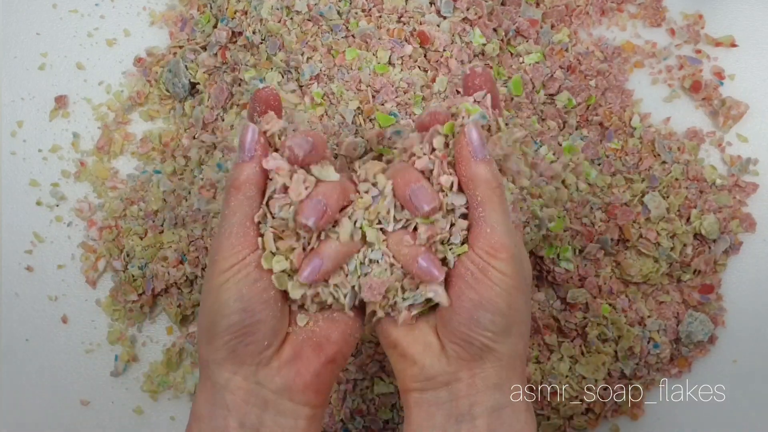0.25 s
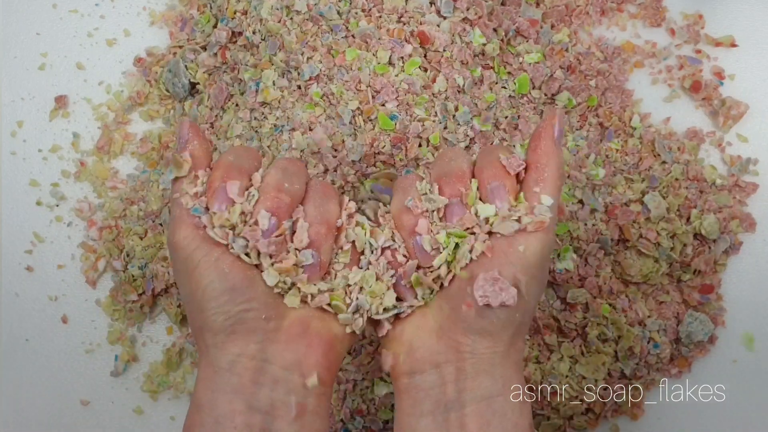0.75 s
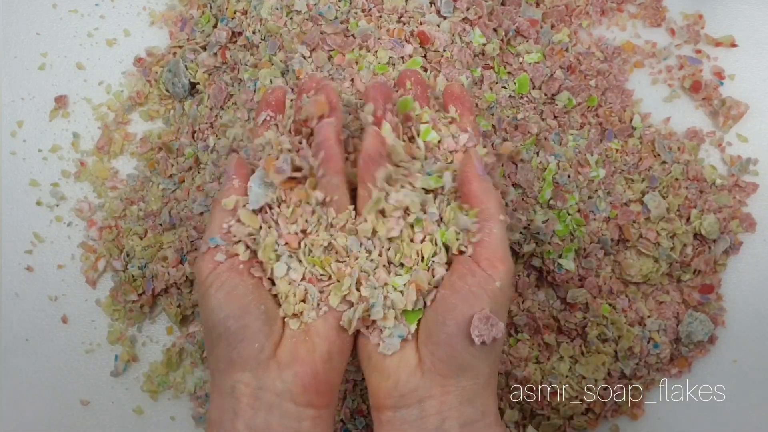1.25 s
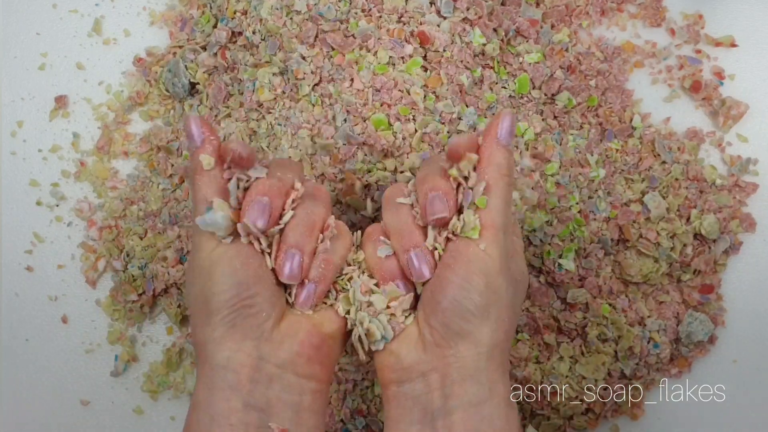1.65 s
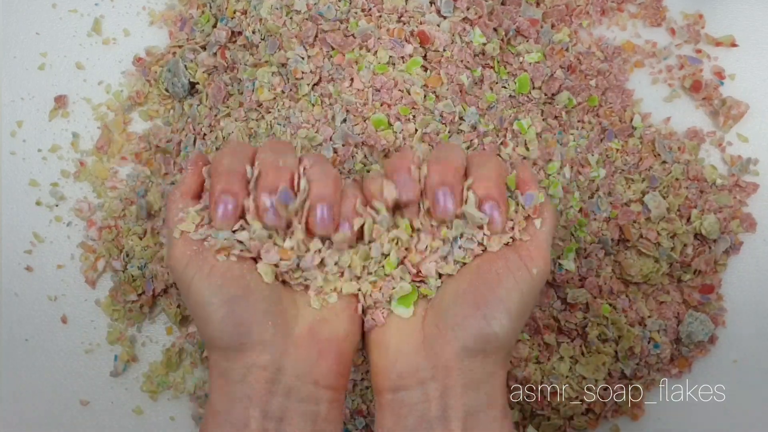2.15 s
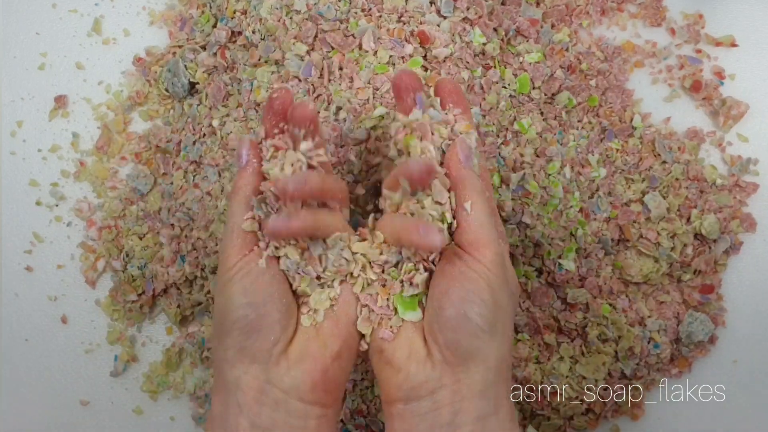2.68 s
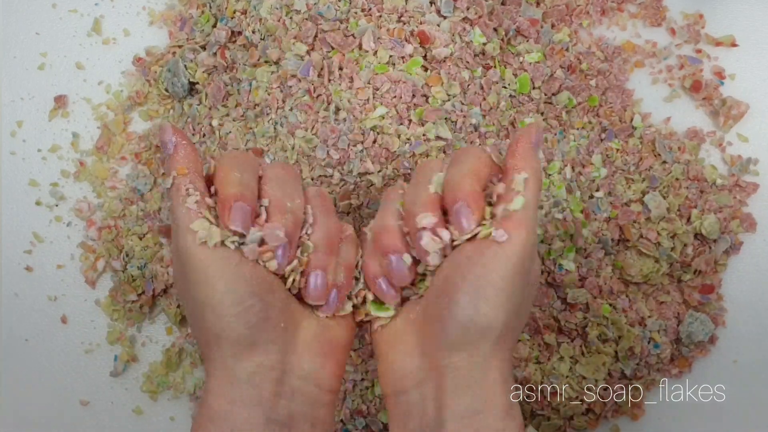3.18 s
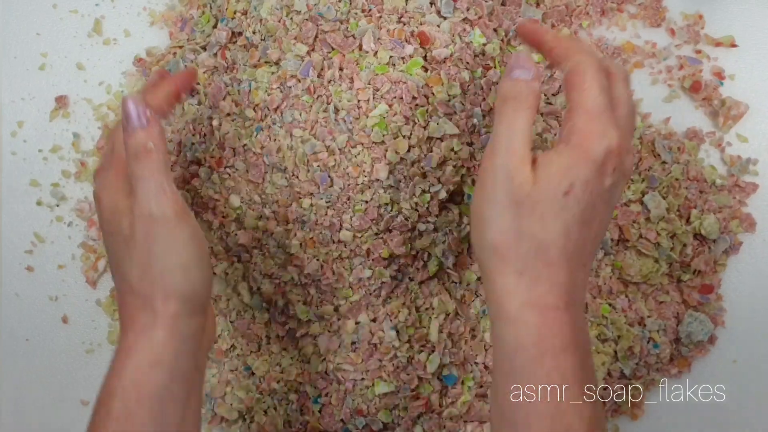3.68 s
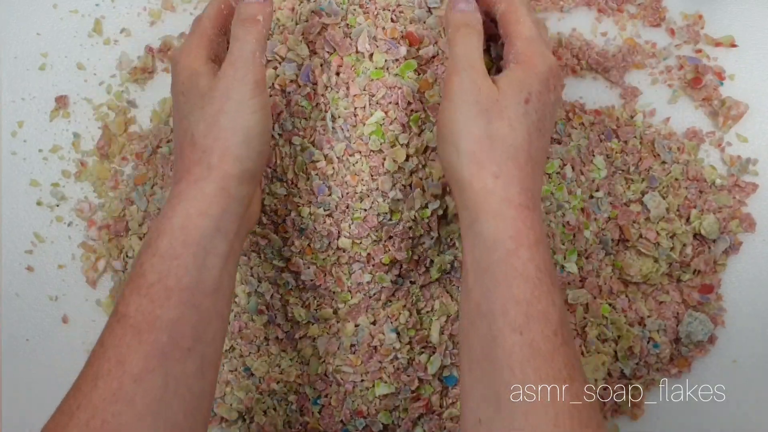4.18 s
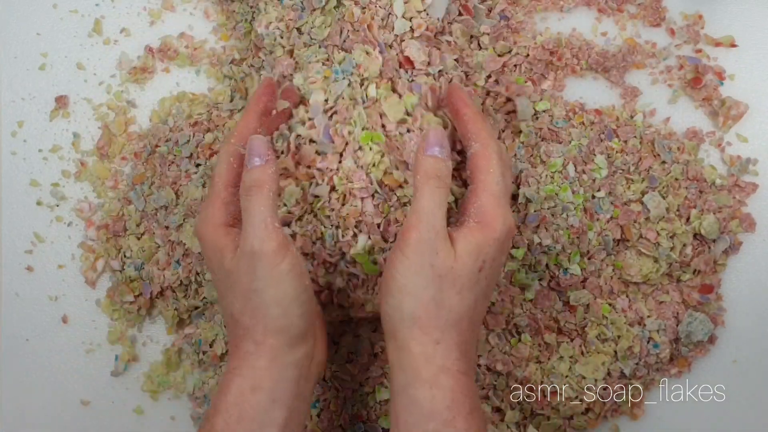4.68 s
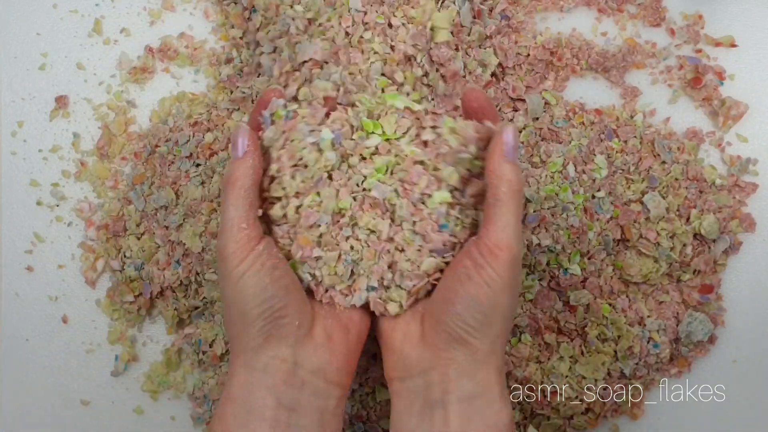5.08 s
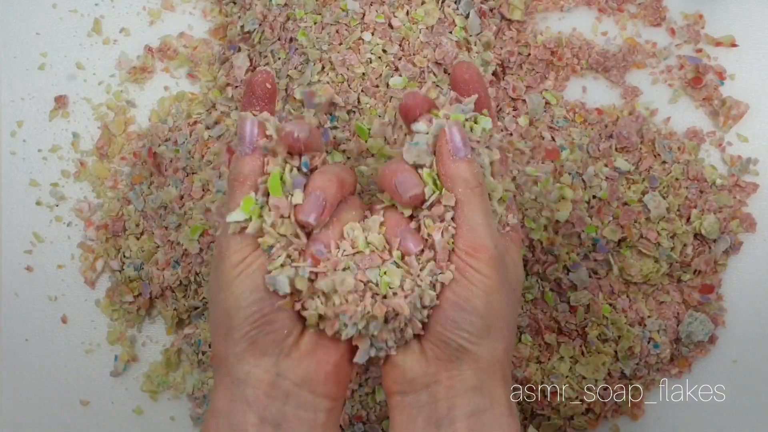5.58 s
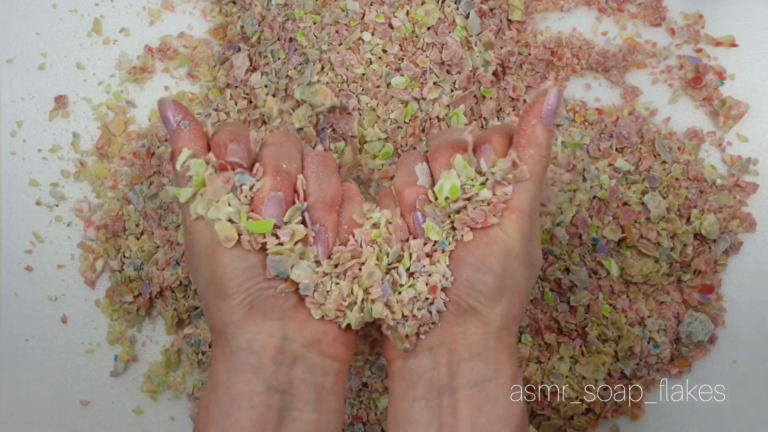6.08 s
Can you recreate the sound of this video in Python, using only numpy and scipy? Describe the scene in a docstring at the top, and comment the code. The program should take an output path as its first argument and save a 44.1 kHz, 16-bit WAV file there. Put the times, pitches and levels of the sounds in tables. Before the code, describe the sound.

Crackly trickling of dry soap flakes kneaded by two hands, nearly pausing, then a low scraping push and a renewed dense, crisp rustle.

```python
"""Hands in a pile of dry soap flakes

Two hands knead, sift and scoop the flakes on a table, close to a pair of microphones, over a hum in a quiet room.
Random tiny contacts make the rustle; filtered noise bursts make single flakes snap as they break.
Duller contacts rub, crunch and rasp in the heap, damped tones thud, and resonances make the table rumble."""
import sys
import numpy as np
from scipy import signal
from scipy.fft import rfft, irfft, next_fast_len
from scipy.io import wavfile

SR = 44100
rng = np.random.default_rng(int(sys.argv[2]) if len(sys.argv) > 2 else 0)


def dump_mix(stems):
    """Bounce the given channels to the path in sys.argv[1] as a 16-bit WAV at rate SR."""
    frames = np.atleast_2d(stems).T  # one column per channel
    limited = np.clip(frames, -1, 1)  # hard clip at full scale
    pcm = np.round(limited * 32767).astype(np.int16)
    wavfile.write(sys.argv[1], SR, pcm)


N = 279153
TIME = np.arange(N) / SR  # seconds

# extra brightness of a breaking edge: pitch_hz, gain_db
EDGE_BRIGHTNESS = [(3500, -6), (5200, -2.5), (7000, -1.5), (10000, -6), (12500, 1), (15500, -4)]
CRUNCH_PAN_DB = 0.5  # left minus right, for crunching, rasping and cracking


def undb(db):
    """Turn decibels into gain."""
    return 10 ** (np.asarray(db) / 20)


def curves(points):
    """Join each column of a table by straight lines in time."""
    s, *columns = np.transpose(points)
    return [np.interp(TIME, s, column) for column in columns]


def unit(x):
    """Scale a stereo sound so that the average of its two sides has rms 1."""
    middle = x.mean(axis=0)
    return x / np.sqrt(np.mean(middle ** 2))


def pan(db):
    """Left and right gains for a level difference, left minus right, with an average power of 1."""
    gains = undb(np.array([db, -db]).reshape(2, -1) / 2)
    return gains / np.sqrt(np.mean(gains ** 2, axis=0))


def colour(x, points):
    """Filter a sound through (pitch_hz, gain_db) points, without any sound before its cause."""
    size = next_fast_len(N + SR // 10, real=True)
    hz, db = np.transpose(points)
    bin_hz = np.arange(size // 2 + 1) * SR / size
    # the 1 Hz offset avoids the logarithm of zero
    log_gain = np.log(undb(np.interp(np.log(bin_hz + 1), np.log(hz), db)))
    # folding the cepstrum forward gives the filter its minimum phase
    cepstrum = irfft(log_gain, size)
    cepstrum[1:size // 2] *= 2
    cepstrum[size // 2 + 1:] = 0
    response = np.exp(rfft(cepstrum))
    return irfft(rfft(x, size) * response, size)[..., :N]


def resonate(x, hz, width_hz):
    """Let one resonance ring, with gain 1 at its centre."""
    b, a = signal.iirpeak(hz, hz / width_hz, fs=SR)
    return signal.lfilter(b, a, x)


def walk(rate):
    """A wandering random value that gets a new target rate times a second; spread near 1."""
    knots = rng.standard_normal(N // 10)
    # straight lines between the knots shrink the spread; the factor restores it
    return np.sqrt(3 / 2) * np.interp(TIME * rate, np.arange(len(knots)), knots)


def add(track, s, sound):
    """Mix a short stereo sound into a track at time s."""
    start = max(int(s * SR), 0)
    track[:, start:start + sound.shape[1]] += sound[:, :N - start]


def swell(peak_s, rise_s, fall_s, db):
    """Gain of one hand movement: it grows to a rounded peak and dies away."""
    span_db, roundness = 20, 1.413  # drop over one rise or fall time; above 1 the top is rounder, the ends steeper
    before = (peak_s - TIME) / max(rise_s, .01)
    after = (TIME - peak_s) / max(fall_s, .01)
    away = np.maximum(before, after)
    return undb(db - span_db * np.minimum(away, 10) ** roundness)


def together(gains):
    """Overlapping movements add in power."""
    return np.sqrt(sum(gain ** 2 for gain in gains))


def contacts(rate, scatter_db, spread_db, likeness):
    """Random tiny impacts of uneven size, each from its own place between the microphones."""
    happens = rng.random(N) < rate / SR
    # a faster flow has smaller impacts, so the average power stays alike
    size = happens * undb(scatter_db * np.minimum(rng.exponential(size=N), 5)) / np.sqrt(rate)
    energy = (size * pan(spread_db * rng.standard_normal(N))) ** 2
    # each contact scrapes for a fraction of a millisecond
    decay = np.exp(-1 / (0.00022 * SR))
    scrape = np.sqrt(signal.lfilter([1], [1, -decay], energy + 1e-18))
    # likeness is the share of noise power that both sides have in common
    likeness = np.clip(likeness, 0, 1)
    shared = np.sqrt(likeness) * rng.standard_normal(N)
    separate = np.sqrt(1 - likeness) * rng.standard_normal((2, N))
    return scrape * (shared + separate)


def background():
    """A distant motor beats slowly against the mains hum, over still room air made of filtered noise."""
    # steady tones of the hum: pitch_hz, level_db (rms, before it wanders)
    hum_tones = [(49.21, -69), (98.46, -75), (100.05, -71)]
    # colour of the room air: pitch_hz, relative_level_db (per Hz)
    air_colour = [(20, -4), (60, -3), (150, -16.5), (400, -13), (1000, -26.5), (3000, -35), (16000, -24.5)]
    hum = np.zeros(N)
    for k, (hz, db) in enumerate(hum_tones):
        gain = np.sqrt(2) * undb(db + 0.77 * walk(3.3))
        tone = np.sin(2 * np.pi * hz * TIME + 0.4 * walk(4.0))
        hum += (-1) ** k * gain * tone  # every other tone is turned upside down
    air = colour(rng.standard_normal(N) + .5 * rng.standard_normal((2, N)), air_colour)
    return hum + unit(air) * undb(-68.5)


def room(x):
    """A small room answers softly from all sides: a noise tail that falls 60 dB in 0.2 s."""
    # colour of the answer: pitch_hz, gain_db (against the direct sound)
    echo_colour = [(150, -17), (300, -15), (600, -9), (1500, -8), (6000, -7), (13000, -9)]
    t = TIME[:SR // 3]
    tail = rng.standard_normal((2, len(t))) * undb(-60 * t / 0.2) * (1 - np.exp(-t / 0.00052))
    tail /= np.sqrt(np.sum(tail ** 2, axis=1, keepdims=True))
    echo = signal.fftconvolve(x, tail, axes=1)[:, :N]
    return x + colour(echo, echo_colour)


def table():
    """Flakes ground under the dragging hands set the resonances of the table top rumbling."""
    # the edges of the hands dragging along the table: peak_s, rise_s, fall_s, level_db
    hand_drag = (3.985, 0.1258, 0.4673, -47)
    # resonances of the table top: pitch_hz, width_hz, relative_level_db
    table_modes = [(225, 10, 13), (292, 40, 15), (325, 14, 11), (404, 27, 15.5), (496, 23, 17.5),
                   (600, 61, 15.5), (735, 37, 17), (960, 50, 17)]
    push = contacts(3500, scatter_db=2, spread_db=2, likeness=.95)
    rumble = sum(undb(db) * resonate(push, hz, width_hz) for hz, width_hz, db in table_modes)
    return unit(rumble) * swell(*hand_drag)


def knocks():
    """A blunt contact gives a short damped thud and a shiver of loose flakes."""
    # fingers and lumps that knock on the heap and table:
    # start_s, level_db (for thud and shiver alike), pitch_hz, ring_ms (time for the thud to fall to 37 %)
    knock_list = [(.086, -38, 755, 3.3), (.667, -37.5, 1755, 5.5), (0.931, -44, 518, 3.7),
                  (.998, -45, 1720, 2.1), (1.534, -47, 810, 11), (1.583, -36.5, 535, 3.2),
                  (1.597, -37, 820, 1.6), (1.721, -44.5, 1700, 12.6), (3.859, -26.5, 825, 2.3),
                  (3.893, -28.5, 760, 2.4), (4.008, -38, 500, 2.2), (4.219, -37, 1080, 2.5),
                  (5.328, -48, 468, 3.8), (5.551, -40.5, 810, 0.63), (6.222, -40, 730, 6.8)]
    t = TIME[:SR // 10]
    out = np.zeros((2, N))
    for s, db, hz, ring_ms in knock_list:
        thud = np.sin(2 * np.pi * hz * t) * np.exp(-1000 * t / max(ring_ms, .3))
        noise = rng.standard_normal((2, len(t))) + rng.standard_normal(len(t))
        shiver = unit(resonate(noise, hz, 0.67 * hz)) * np.exp(-t / 0.015)
        add(out, s, undb(db) * (undb(-5.5) * thud + undb(-13.0) * shiver))
    return out


def heap(flow):
    """Buried flakes rub dully, crunch against each other and rasp along the skin."""
    # the fingers push into the heap:
    # peak_s, rise_s, fall_s, rub_db (dull rubbing), crunch_db (relative to the rubbing)
    presses = [(.07, 0.38, 0.27, -58, -4), (.3, 0.48, 0.61, -62.5, -1.5), (.68, 0.28, 0.32, -65.5, -2.5),
               (.88, 0.13, 0.27, -63, -11.5), (1.02, 0.065, 0.31, -67.5, 3), (1.6, 0.22, .24, -57, -13),
               (2.031, 0.094, 0.28, -60.5, -16), (2.66, 0.16, 0.61, -80, -6), (2.98, 0.17, 0.48, -75.5, -7),
               (3.36, 0.3, 0.45, -65.5, -7), (3.64, 0.31, 0.69, -68.5, -10), (4.042, 0.16, 0.2, -44, -9.5),
               (4.68, 0.22, 0.24, -59, -11), (4.88, 0.2, 0.085, -65, -4.5), (5.22, 0.051, 0.39, -66, -4),
               (5.39, 0.3, 0.28, -57.5, -5.5), (5.87, 0.6, 0.33, -64, -6.5), (6.25, 0.35, 0.21, -58, -8)]
    # a closing hand squeezes flakes along the skin: peak_s, rise_s, fall_s, rasp_db
    squeezes = [(.67, .18, 0.11, -64.5), (1.01, 0.062, 0.11, -65), (1.72, 0.16, 0.14, -64.5),
                (2.0, 0.29, 0.42, -74), (3.27, 0.49, .15, -76.5), (4.06, 0.15, 0.28, -55),
                (5.95, 0.3, 0.15, -65.5), (6.23, 0.36, 0.16, -70.5)]
    # colours of the three sounds: pitch_hz, relative_level_db
    rub_colour = [(100, -20.5), (200, -14), (290, -11), (420, 5.5), (600, -3.5), (780, -1), (1020, -4.5),
                  (1350, -16), (2200, -52), (5000, -46)]
    crunch_colour = [(600, -33), (1300, -10), (1800, -6.5), (2300, -2), (2800, 1.5), (3400, -8.5),
                     (4500, -2), (8000, -18.5)]
    rasp_colour = [(700, -43), (1250, -1), (1550, 5), (1780, 6.5), (2050, 2), (2600, -5), (5000, -52)]
    rubbing = together(swell(s, rise, fall, db) for s, rise, fall, db, _ in presses)
    crunching = together(swell(s, rise, fall, db + crunch_db) for s, rise, fall, db, crunch_db in presses)
    # every push rasps a little too
    rasping = together([rubbing * undb(-20.5)] + [swell(*squeeze) for squeeze in squeezes])
    rub = colour(contacts(.25 * flow, scatter_db=2.8, spread_db=3, likeness=.85), rub_colour)
    crunch = colour(contacts(.4 * flow, scatter_db=3.2, spread_db=7, likeness=.08), crunch_colour)
    rasp = colour(contacts(.3 * flow, scatter_db=2.9, spread_db=5, likeness=.15), rasp_colour)
    crisp_part = unit(crunch) * crunching + unit(rasp) * rasping
    return unit(rub) * rubbing + crisp_part * pan(CRUNCH_PAN_DB)


def flake_ring(x):
    """Thin flakes ring in the top treble, with a different left-right balance at each pitch."""
    # ring of the flakes: pitch_hz, gain_db
    ring_colour = [(1500, -28.5), (3300, -27.5), (4100, -17), (5600, -15), (7300, -5.5), (8600, -13.5),
                   (10200, -7.5), (12000, -5), (13400, -1.5), (15800, -6)]
    # balance between the sides: pitch_hz, left_minus_right_db
    ring_balance = [(4000, -2), (7500, -4.5), (9500, -3), (12800, 6), (15500, -1)]
    left, right = colour(x, ring_colour)
    to_left = [(hz, db / 2) for hz, db in ring_balance]
    to_right = [(hz, -db / 2) for hz, db in ring_balance]
    return np.array([colour(left, to_left), colour(right, to_right)])


def fractures(t, count):
    """Envelope of one break: a first fracture, a few smaller ones soon after, and settling crumbs."""
    height_s = 0.00044  # time from the start of a fracture to its height
    run_s, run_db = 0.0079, -8  # latest start and greatest level of the smaller fractures
    crumbs_db, crumbs_s = -15, .006  # level and decay time of the crumbs
    delays = np.append(0, run_s * rng.random(count))
    sizes = np.append(1, undb(run_db) * rng.random(count))
    ages = np.maximum(t - delays[:, None], 0) / height_s
    crumbs = undb(crumbs_db) * np.exp(-t / crumbs_s) * (1 - np.exp(-ages[0]))
    return sizes @ (ages * np.exp(1 - ages)) ** 2 + crumbs


def snaps():
    """A flake breaks in a quick run of fractures, then its crumbs settle."""
    # the loudest flakes that snap or land: start_s, level_db (before the filters),
    # left_minus_right_db (of the bright part), crack_db (low crack, relative to level_db)
    snap_list = [(.063, -22, -12, -30), (.334, -29, 1, -40), (0.4963, -20.5, 37, -30),
                 (0.6672, -17.5, -13, -36), (0.7756, -17.5, 5.5, -27), (.7905, -18, 18, -45),
                 (0.8284, -20, 31, -32), (0.8779, -20, 26, -28), (0.93, -20.5, 9, -34),
                 (.9818, -16, 2, -24), (0.9973, -10, -20, -9.5), (1.0909, -18.5, -35, -16.5),
                 (1.1458, -24, -4, -29), (1.3076, -38, 5, -32), (1.5843, -18, -3, -26),
                 (1.8945, -30, 13, -30), (1.9201, -23, 5, -20.5), (2.0084, -27, 7, -37),
                 (2.4322, -26, 6, -39), (2.5856, -24.5, 7, -45), (2.688, -35, 8, -40),
                 (2.6966, -28, 1, -46), (3.0645, -26.5, 12, -27), (3.107, -24, 9, -53),
                 (3.2529, -27.5, 8, -28), (3.3148, -25.5, 1, -37), (3.6689, -22.5, 7, -41),
                 (3.7649, -25, 1, -42), (3.8577, -20, 2, -44), (3.887, -17.5, -11, -31),
                 (5.7612, -23.5, 18, -39), (5.8148, -27, 11, -32), (6.285, -18, 3, -24)]
    # body of a thick flake: pitch_hz, gain_db
    crack_colour = [(400, -20), (1000, -12), (1500, -1), (2200, 1), (3000, -12), (4000, 0), (5500, -4),
                    (7300, -7), (10000, -20)]
    t = TIME[:SR // 12]
    bright, low = np.zeros((2, N)), np.zeros((2, N))
    for s, db, pan_db, crack_db in snap_list:
        noise = rng.choice([-1, 1], (2, len(t)))
        burst = noise * fractures(t, count=3) * undb(db)
        add(bright, s, burst * pan(pan_db))
        # a thick flake also cracks lower down
        add(low, s, burst * undb(crack_db))
    ring = flake_ring(colour(bright, EDGE_BRIGHTNESS))
    return ring + colour(low, crack_colour) * pan(CRUNCH_PAN_DB)


def slips(rate, settle_s):
    """Power of little avalanches: each starts at once and dies away; its average is near 1."""
    power = (rng.random(N) < rate / SR) * rng.exponential(size=N) / (rate * settle_s)
    return signal.lfilter([1], [1, -np.exp(-1 / (settle_s * SR))], power)


def rustle(flow):
    """Fine crumbs trickle more smoothly; larger flakes slip in crisp avalanches, rougher in a slow flow."""
    # flakes trickling through the moving hands: time_s, level_db
    sift_levels = [(0, -42), (.5, -45.5), (.63, -47.5), (.93, -53.5), (1.2, -51), (1.6, -48.5),
                   (1.85, -53.5), (2.4, -56.5), (2.8, -54), (3.03, -51), (3.28, -61), (3.82, -69),
                   (3.9, -54), (4.47, -54.5), (4.58, -52), (5.08, -52), (5.4, -41), (5.75, -48.5),
                   (6.33, -50)]
    # a batch of flakes gives way and slides: peak_s, rise_s, fall_s, level_db, left_minus_right_db
    spill_list = [(.53, 0.064, 0.035, -42.5, 0), (.675, 0.035, 0.07, -43, 3), (.83, 0.065, 0.13, -48, 0),
                  (1.0, 0.023, 0.18, -49.5, 6), (1.659, 0.12, 0.068, -43.5, 1.5),
                  (2.19, 0.026, 0.048, -49, 5), (2.32, 0.14, 0.049, -53.5, 5),
                  (2.695, 0.031, .06, -49.5, 5), (3.2, 0.044, 0.066, -49.5, 7), (3.325, .015, 0.14, -46, 3),
                  (3.499, 0.26, .25, -41, 5.5), (4.06, 0.093, 0.15, -49, -4),
                  (5.691, 0.15, 0.057, -46.5, 4), (5.87, 0.088, 0.29, -46, 5),
                  (6.14, 0.18, 0.063, -45, 1.5), (6.29, 0.036, 0.028, -52, -1)]
    sift_db, = curves(sift_levels)
    sift = undb(sift_db) * pan(3.3)
    spills = [swell(s, rise, fall, db) * pan(pan_db) for s, rise, fall, db, pan_db in spill_list]
    # a steady part, larger avalanches and smaller ones, weighted in power
    power = 0.14 + 0.38 * slips(rate=60, settle_s=0.0092) + 0.12 * slips(rate=190, settle_s=0.0023)
    # above 2000 contacts per second the avalanches even out, below it they grow rougher
    avalanches = np.sqrt(power) ** ((2000 / flow) ** 0.32)
    # the avalanches shape the fine crumbs more weakly
    fine = contacts(2 * flow, scatter_db=2.8, spread_db=4, likeness=.05) * avalanches ** .7
    coarse = contacts(0.88 * flow, scatter_db=3.0, spread_db=7, likeness=0.049)
    coarse = colour(coarse, EDGE_BRIGHTNESS) * avalanches
    fine_db, coarse_db = -2.5, -2.5
    grains = unit(flake_ring(fine)) * undb(fine_db) + unit(flake_ring(coarse)) * undb(coarse_db)
    return grains * together([sift] + spills)


def scene():
    """Everything the hands stir up sounds in the room, over the background."""
    # how freely the flakes run: time_s, contacts_per_s (each layer takes its own multiple)
    flow_points = [(0, 10300), (.5, 3100), (.9, 2800), (1.4, 3660), (2.3, 1770), (3.2, 3700), (3.5, 7200),
                   (3.8, 750), (4.05, 11000), (5.45, 12300), (5.8, 3700), (6.33, 2700)]
    flow, = curves(flow_points)
    stirred = rustle(flow) + heap(flow) + table() + snaps() + knocks()
    return room(stirred) + background()


def record(sound):
    """The recorder cuts the very top, above 15900 Hz, with a steep filter."""
    low_pass = signal.ellip(12, .2, 80, 15900, fs=SR, output="sos")
    return signal.sosfilt(low_pass, sound)


dry = scene()
out = record(dry)
dump_mix(out)
```